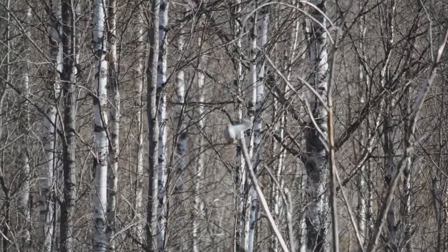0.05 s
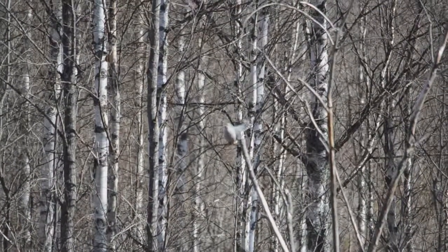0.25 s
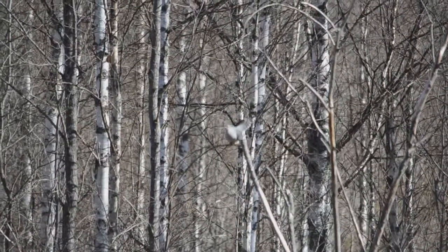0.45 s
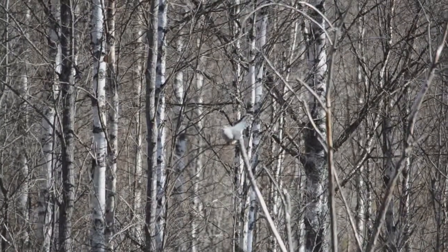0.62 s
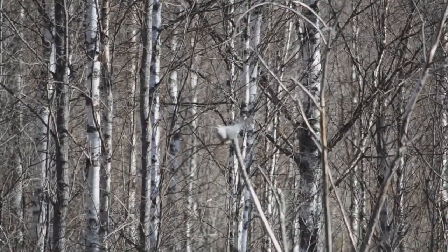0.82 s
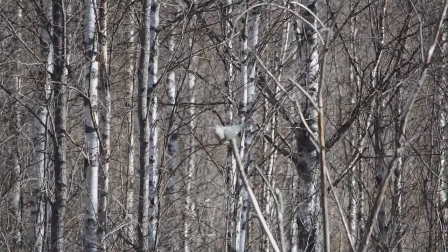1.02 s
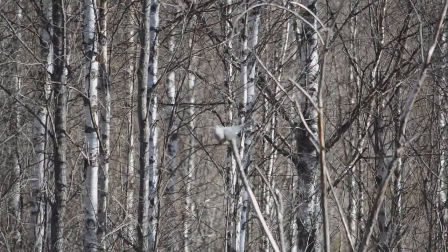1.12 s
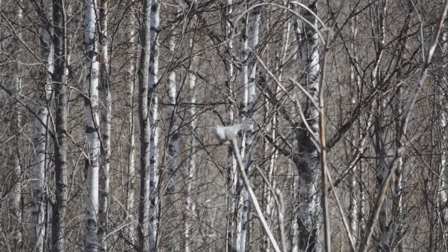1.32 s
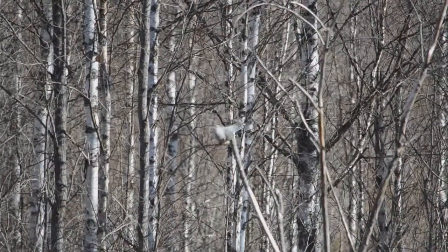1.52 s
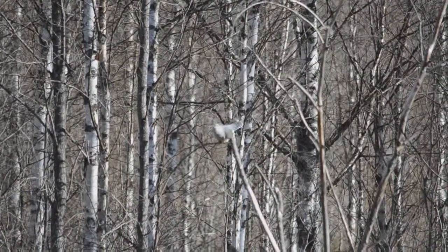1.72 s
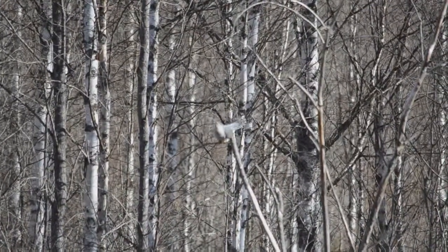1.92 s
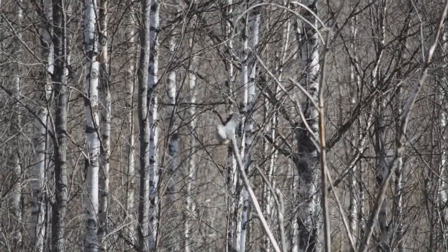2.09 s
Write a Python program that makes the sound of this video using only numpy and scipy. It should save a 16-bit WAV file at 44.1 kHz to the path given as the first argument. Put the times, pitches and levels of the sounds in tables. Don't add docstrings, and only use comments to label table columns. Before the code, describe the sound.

A cuckoo calls in a bare birch wood. The tail of earlier calls lingers faintly; light knocks on the camera come at 0.14 s, with a dull thud near 0.28. A short, arched high hoot sounds at 0.2 s, a quieter, level lower hoot at 0.57. Echoes fade over faint wind and hiss with a very thin high whine, until the next high note at 1.8 s.

```python
import sys
import numpy as np
from scipy import signal
from scipy.io import wavfile
from scipy.ndimage import uniform_filter1d

SR = 44100
rng = np.random.default_rng(int(sys.argv[2]) if len(sys.argv) > 2 else 0)


def decibels_to_gain(level_db):
    exponent = np.asarray(level_db, float) / 20
    return 10 ** exponent


def generate_wav(sig):
    pcm = np.round(np.clip(np.atleast_2d(sig).T, -1, 1) * 32767).astype(np.int16)
    wavfile.write(sys.argv[1], SR, pcm)


N = 94815
LEAD = int(1.5 * SR)


# multiple of the pitch, level in dB at full voice,
# share of the voice's rise and fall that it follows.
OVERTONES = [(2, -70, -.1), (5, -76.5, 1.3), (6, -87, .5)]


def sing(shape, sung):
    t = (np.arange(N + LEAD) - LEAD) / SR
    out = np.zeros(len(t))
    shape_s, shape_hz, shape_db = np.transpose(shape)
    for start, factor, stretch, level_db in sung:
        u = (t - start) / stretch
        on = (u > 0) & (u < shape_s[-1])
        level = uniform_filter1d(np.interp(u, shape_s, shape_db), size=200)
        pitch = uniform_filter1d(np.interp(u, shape_s, shape_hz), size=200) * factor
        pitch = pitch * (1 + .001 * drift(40, len(t)))
        phase = 2 * np.pi * np.cumsum(pitch * on) / SR
        voice = decibels_to_gain(level + level_db) * np.sin(phase)
        for multiple, top_db, share in OVERTONES:
            voice += decibels_to_gain(top_db + share * (level + 29)) * np.sin(round(multiple) * phase)
        edge = np.clip(np.minimum(u, shape_s[-1] - u) / .004, 0, 1)
        out += np.sqrt(2) * edge * voice
    return out


# time from its start in seconds, pitch in Hz, level in dB.
HIGH_SHAPE = [(0, 470, -64), (.014, 545, -50), (.022, 625, -37), (.031, 662, -29), (.055, 669, -28),
              (.08, 679, -27), (.096, 652, -28.5), (.113, 578, -33.5), (.127, 530, -48)]
# time from its start in seconds, pitch in Hz, level in dB.
LOW_SHAPE = [(0, 510, -64), (.014, 524, -44), (.028, 530, -38), (.06, 531, -35), (.096, 528, -35.5),
             (.13, 527, -41), (.168, 522, -44.5), (.198, 519, -41), (.228, 512, -53)]
# start in seconds, pitch factor, time stretch, level in dB.
HIGH_NOTES = [
    (-1.36, 1.001, 1.001, -3),
    (.210, 1.0, 1.0, 0.5),
    (1.785, 1.004, .975, -1.2),
]
# start in seconds, pitch factor, time stretch, level in dB.
LOW_NOTES = [
    (-1.0, 1.001, 1.001, -3),
    (.569, 1.0, 1.0, 0),
]


def cuckoo():
    return sing(HIGH_SHAPE, HIGH_NOTES) + sing(LOW_SHAPE, LOW_NOTES)


# delay in seconds, level in dB.
ECHOES = [(0.0329, -16.3), (0.0431, -26.4), (0.0512, -17.5), (0.0576, -21.7), (0.0816, -27.4),
          (0.1045, -22.9), (0.12, -23.8), (0.141, -31.9), (0.1542, -29.0), (0.1662, -28.6), (0.1934, -23.8),
          (0.2104, -26.2), (0.2175, -30.4), (0.2354, -34.8), (0.2465, -29.1), (0.2864, -29.2),
          (0.5159, -35.8), (0.5265, -30.6), (0.5608, -38.5), (0.5986, -34.9), (0.6327, -38.3),
          (0.644, -37.7), (0.6896, -39.6), (0.7073, -38.8), (0.7444, -36.6), (0.8145, -34.6),
          (0.8585, -38.1), (0.9111, -36.1),
          (.3893, -28), (.4546, -32), (.4844, -31)]


def wood(song):
    t = np.arange(3 * SR) / SR
    cloud = np.zeros(len(t))
    near, far = (-29, .7), (-20.5, 2.4)
    for db, t60 in (near, far):
        unit = np.sqrt(6 * np.log(10) / t60 / SR)
        cloud += decibels_to_gain(db - 60 * t / t60) * unit * rng.standard_normal(len(t))
    cloud *= 1 - np.exp(-t / .3)
    for delay, db in ECHOES:
        cloud[round(delay * SR)] += decibels_to_gain(db + 1.5)
    dull = signal.sosfiltfilt(signal.butter(1, 2500, fs=SR, output="sos"), song)
    return song + signal.fftconvolve(dull, cloud)[:len(song)]


def ring(clicks, hz, t60):
    r = decibels_to_gain(-60 / (t60 * SR))
    w = 2 * np.pi * hz / SR
    return signal.lfilter([0, np.sin(w)], [1, -2 * r * np.cos(w), r * r], clicks + 1e-18)


# start in seconds, peak level in dB, brightness in Hz.
KNOCKS = [
    (.1382, -46, 2600),
    (.1418, -37, 2600),
    (.1455, -48, 2200),
    (.149, -54, 2000),
    (.166, -46, 190),
    (.275, -48, 240),
    (.8735, -60, 3500),
    (1.385, -56, 200),
    (1.5994, -62, 3500),
]
# pitch in Hz, level in dB, seconds to fade by 60 dB.
BODY = [(125, -7, .05), (205, 0.5, .03), (290, -3, .02), (430, -6, .012), (620, -4, .012), (1012, -2, .045),
        (1400, -4, .015), (1900, -6, .015), (2400, -10, .012), (3000, -18, .008)]


def knocks():
    out = np.zeros(N)
    t = np.arange(4000) / SR
    spread_db = rng.normal(0, 2.0, (len(KNOCKS), len(BODY)))
    for (start, db, bright_hz), own_db in zip(KNOCKS, spread_db):
        hit = decibels_to_gain(-10) * rng.standard_normal(len(t)) * np.exp(-t / .004)
        for (hz, level_db, t60), extra_db in zip(BODY, own_db):
            hit += decibels_to_gain(level_db - 5 + extra_db) * ring(1. * (t == 0), hz, t60)
        band = signal.butter(2, [90, bright_hz], "band", fs=SR, output="sos")
        hit = signal.sosfilt(band, signal.sosfilt(band, hit))
        first = int(start * SR)
        out[first:first + len(t)] += decibels_to_gain(db) * hit
    return out


def tick():
    start_s, level_db, length_s = .2044, -61, .0007
    u = np.arange(N) / SR - start_s
    fade = (u > 0) * np.exp(-(np.maximum(u, 0) / length_s) ** 2)
    snap = decibels_to_gain(level_db) * rng.standard_normal(N) * fade
    return signal.sosfilt(signal.butter(2, 8000, "high", fs=SR, output="sos"), snap)


# frequency in Hz, level of the band there in dB.
WIND = [(25, -18), (70, -10), (200, -10.5), (350, -5), (800, -4.5), (1800, -13.5), (6500, -36),
        (15500, -41.5)]


def wind():
    level_db, gust_db, flicker_db = -59.5, .63, .85
    out = np.zeros(N)
    together = drift(3, N)
    edges = 20 * 2 ** np.arange(0, 9.8, 1 / 3)
    white = rng.standard_normal((2, N + SR))
    hz, db = np.transpose(WIND)
    for k, (low, high) in enumerate(zip(edges, edges[1:])):
        band_filter = signal.butter(2, [low, high], "band", fs=SR, output="sos")
        band = signal.sosfilt(band_filter, white[k % 2])[SR:]
        band_db = np.interp(np.log(low * high) / 2, np.log(hz), db)
        out += band * decibels_to_gain(band_db + gust_db * together + flicker_db * drift(12, N))
    return decibels_to_gain(level_db) * out / out.std()


# start in seconds, length in seconds, pitch drop in Hz.
STUMBLES = [
    (.662, .022, 450),
    (1.964, .022, 450),
]
# pitch in Hz, level in dB.
TONES = [
    (7500, -101),
    (15000, -112),
]


def whine():
    t = np.arange(N) / SR
    hz = 15694.9 + .8 * drift(8, N)
    gain = np.ones(N)
    for start, length, drop_hz in STUMBLES:
        u = t - start
        on = (u > 0) & (t < start + length)
        hz = hz - on * drop_hz * (1 - u / length)
        gain = gain * (1 - on * np.cos(np.pi * 190 * u) ** 2)
    out = decibels_to_gain(-86) * gain * np.sin(2 * np.pi * np.cumsum(hz) / SR)
    for tone_hz, db in TONES:
        out += decibels_to_gain(db) * np.sin(2 * np.pi * tone_hz * t)
    return np.sqrt(2) * out


def drift(rate, size):
    r = np.exp(-80 * np.pi * rate / SR)
    slow = signal.lfilter([1], [1, -2 * r, r * r], rng.standard_normal(size // 40 + 2002))
    slow = slow[2000:]
    return np.interp(np.arange(size) / 40, np.arange(len(slow)), slow / slow.std())


def scene():
    bird = wood(cuckoo())[LEAD:]
    return (bird + knocks() + tick() + wind() + whine())[None]


def low_pass(x):
    return signal.sosfilt(signal.butter(12, 15850, fs=SR, output="sos"), x)


def record(dry):
    top_cut = signal.ellip(10, .5, 70, 15850, fs=SR, output="sos")
    mix = signal.sosfilt(top_cut, dry) + .0006
    return low_pass(mix)


dry = scene()
out = record(dry)
generate_wav(out)
```